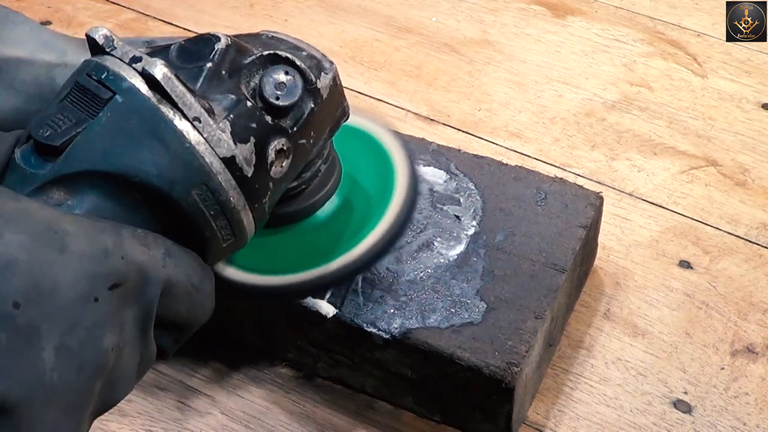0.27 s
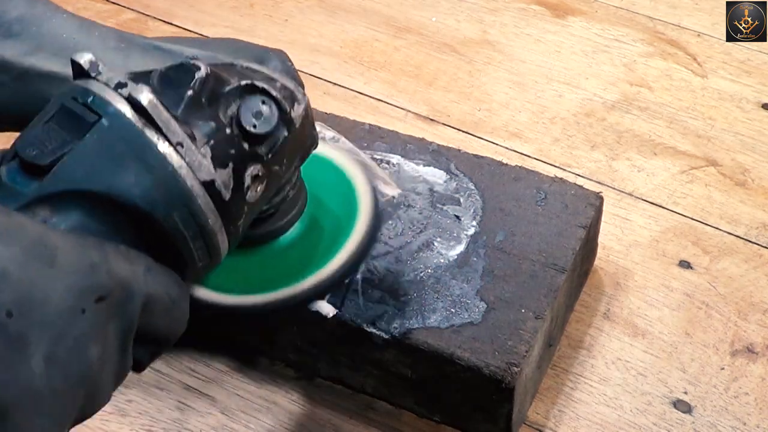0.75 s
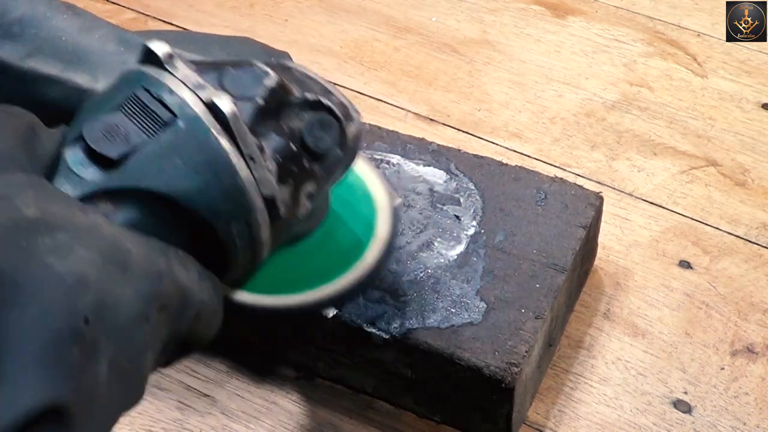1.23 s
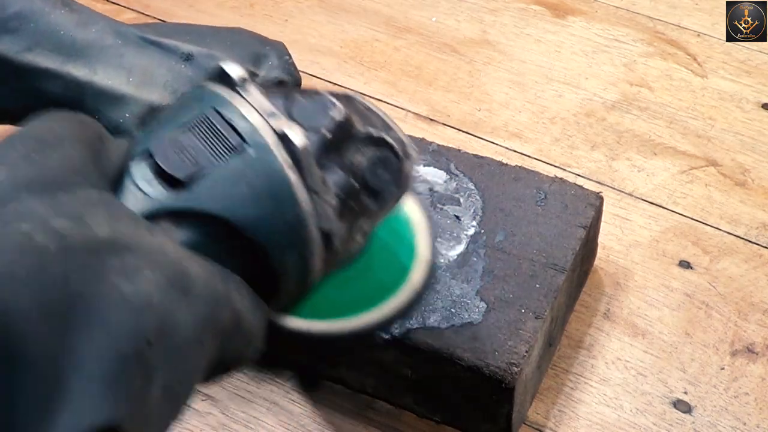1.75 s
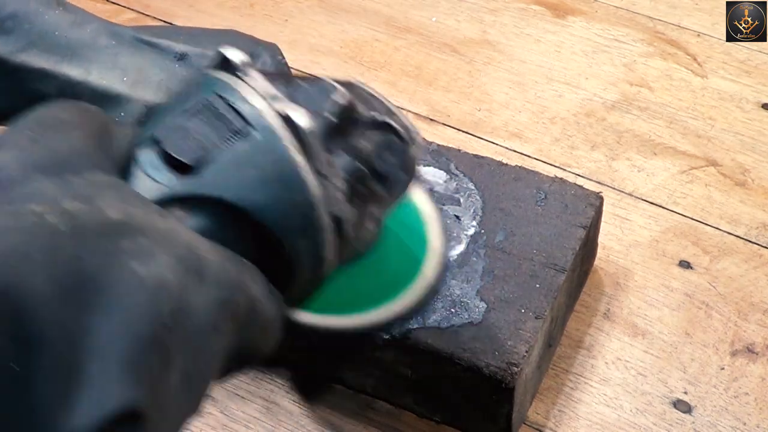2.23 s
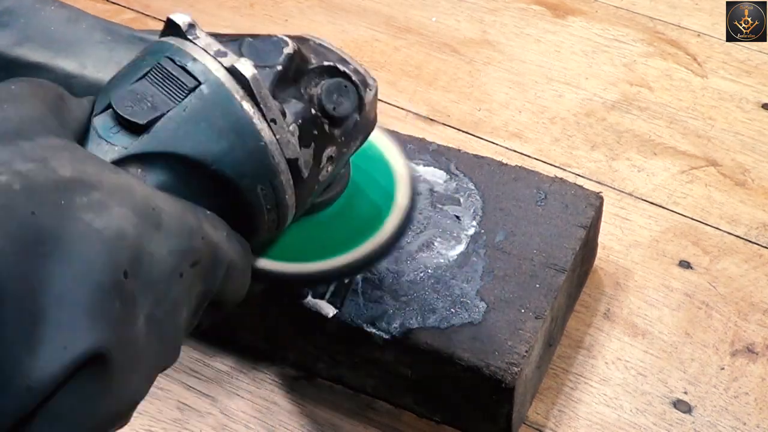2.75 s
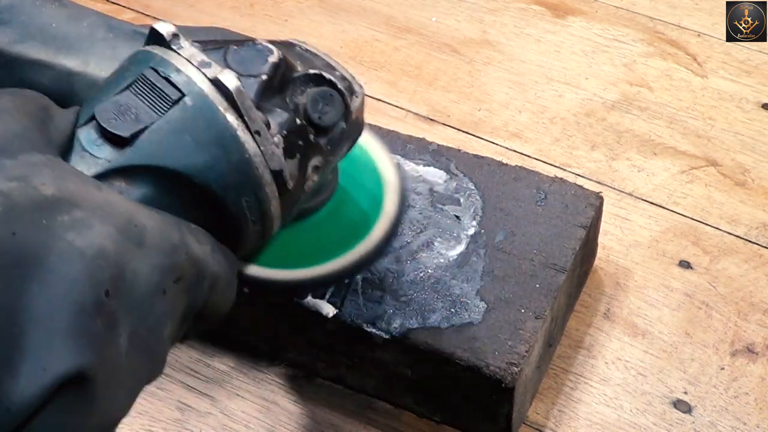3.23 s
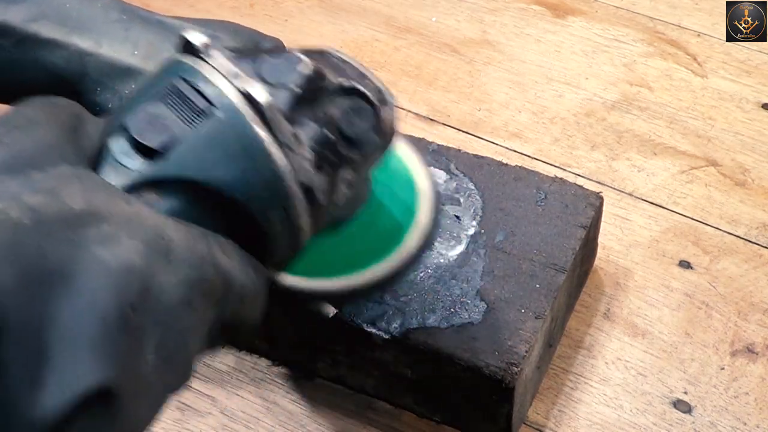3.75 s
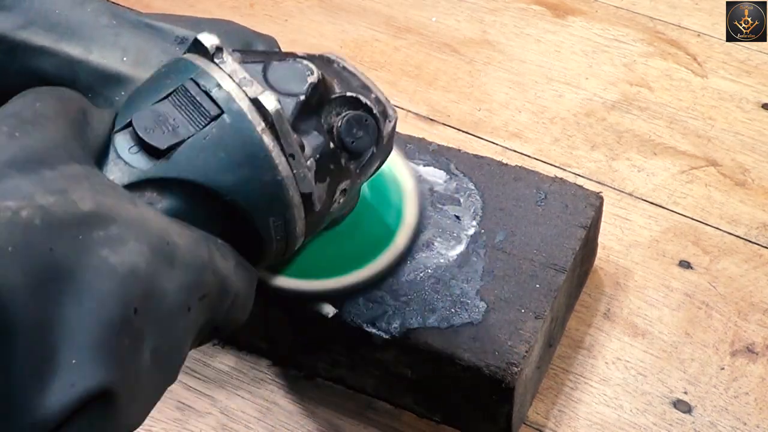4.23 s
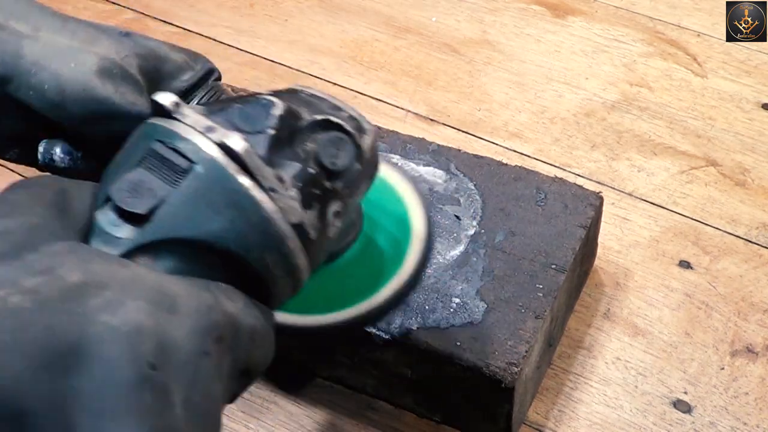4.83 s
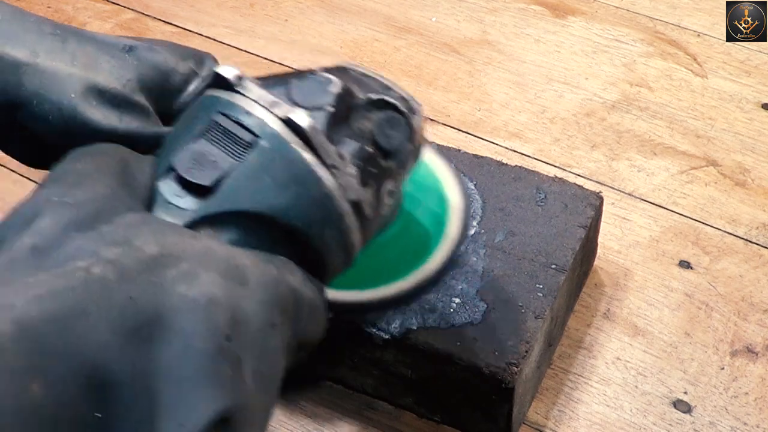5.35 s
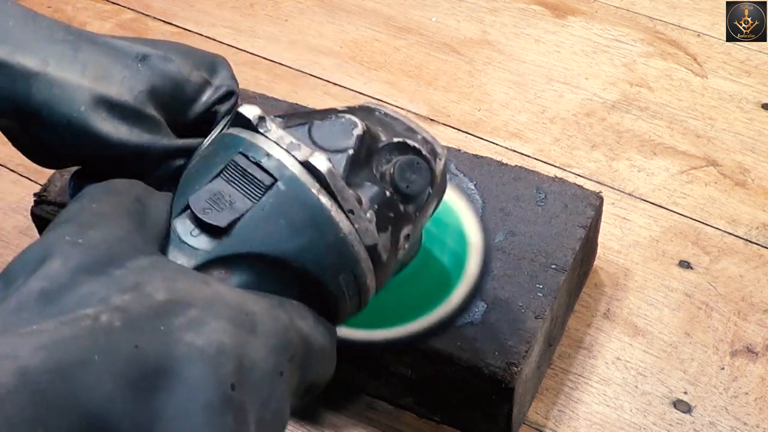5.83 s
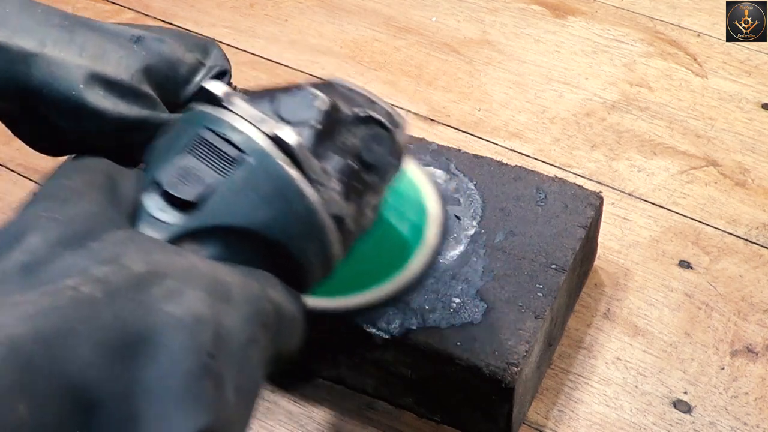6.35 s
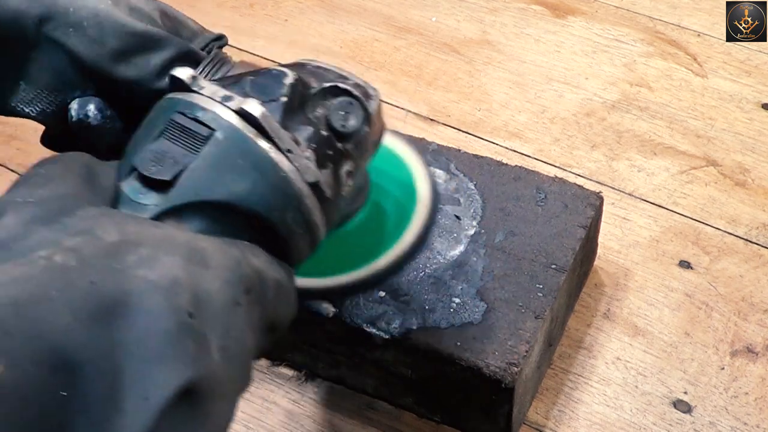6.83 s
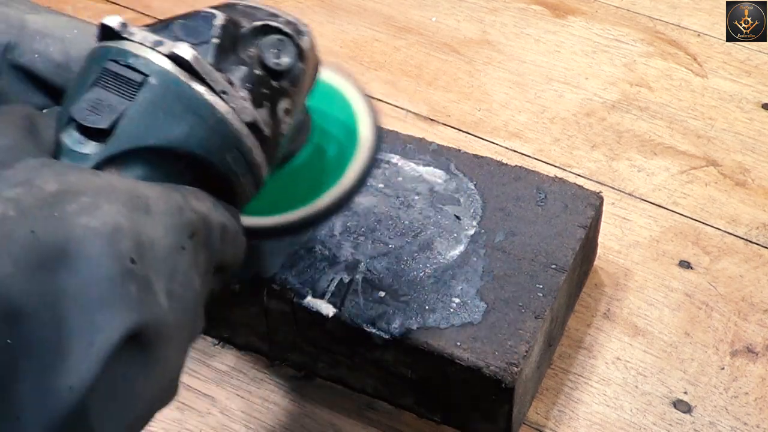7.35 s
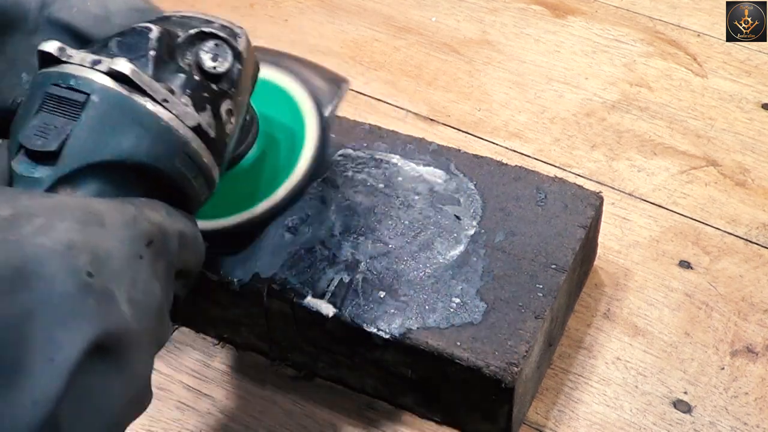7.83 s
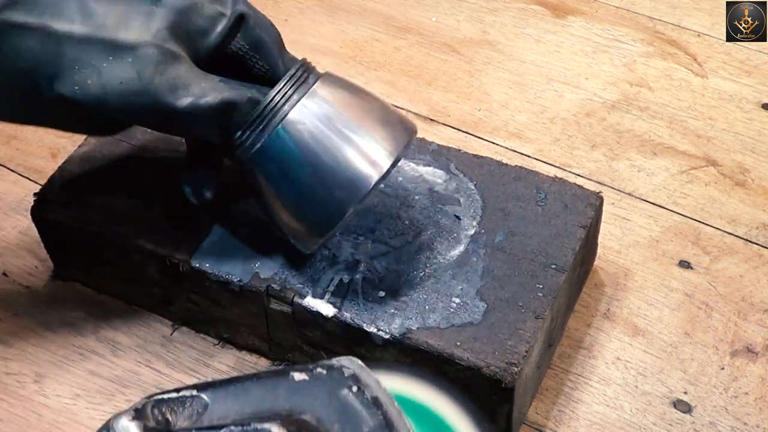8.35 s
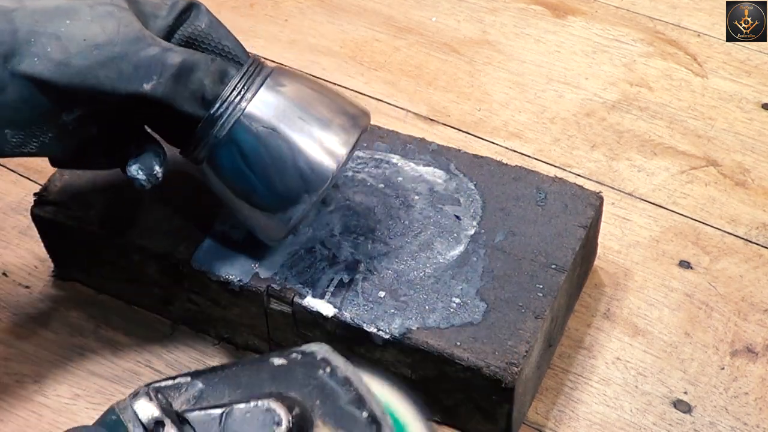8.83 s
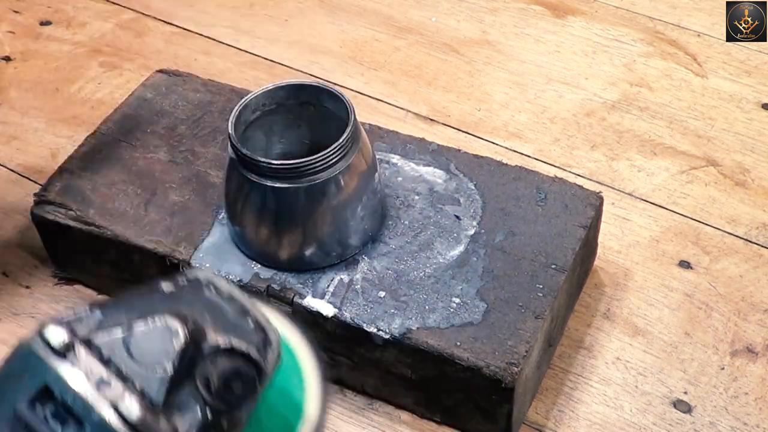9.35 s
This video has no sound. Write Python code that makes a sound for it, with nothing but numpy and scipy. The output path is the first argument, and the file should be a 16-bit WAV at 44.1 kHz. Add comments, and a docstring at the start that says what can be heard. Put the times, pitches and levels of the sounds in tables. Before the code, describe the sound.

A close, dry angle grinder fills the stretch without pause. From 0 s it runs fast and light: a motor hum near 450 Hz, a strong bearing whine near 1.4 kHz, thin higher whistles and broad, bright rasp with airy hiss. Around 0.6-1 s the pad bites on the metal pot and the pitch sags noticeably, turning rougher and fluttery, with small swells and dips. It briefly recovers near 3.2 s, then sags again. At about 4.8 s everything abruptly steps down in pitch, hum near 300 Hz and whine just under 1 kHz. Grinding continues unevenly, easing upward briefly around 7.2 s and sagging by 7.9 s. Lifted at about 8.1 s, it climbs to a smoother, free-running whine with hissier air. Switched off near 8.9 s, it glides down with a slight loose rattle, softening but not stopping by the end, around 9.6 s.

```python
"""The hum and bearing whine of an angle grinder, sagging as its pad presses on a small metal pot; pad rasp and air hiss.
Hum, whine and overtones are sine partials locked to one rotor speed; rasp and air are shaped stereo noise.
Until 4.825 s it runs sped up, with resonances 1.283 times higher; then the pitch steps down.
Near the end the grinder is lifted, turned aside and switched off, and starts to coast down."""
import sys
import numpy as np
from scipy import signal
from scipy.fft import rfft, irfft, next_fast_len
from scipy.io import wavfile
from scipy.ndimage import uniform_filter1d

SR = 44100
rng = np.random.default_rng(int(sys.argv[2]) if len(sys.argv) > 2 else 0)


def dump_mix(stems):
    """Bounce the given channels to the path in sys.argv[1] as a 16-bit WAV at rate SR."""
    frames = np.atleast_2d(stems).T  # one column per channel
    limited = np.clip(frames, -1, 1)  # hard clip at full scale
    pcm = np.round(limited * 32767).astype(np.int16)
    wavfile.write(sys.argv[1], SR, pcm)


N = 422478

FAST_UNTIL_S, SPEEDUP = 4.825, 1.283
OFF_S, COAST_S = 8.92, 0.93  # switch-off; time constant of the run-down
BEARING_ORDER = 19 / 6  # ball passes per rotor turn
SQUEAL_MULTIPLE = 6  # of the ball-pass rate
BAND_LIMIT_HZ = 15870

# rotor speed under drive, sped-up part: t/s, speed/(turns per s)
SPEED_FAST = [(0, 457.0), (0.6, 455.9), (0.96, 391.1), (1.2, 389.6), (1.68, 378.1), (1.91, 387.4),
              (2.02, 383.3), (2.49, 396.2), (2.59, 392.2), (2.9, 405.4), (3.06, 402.6), (3.26, 429.2),
              (3.45, 404.1), (4.1, 388.5), (4.35, 400.6), (4.82, 407.2)]
# rotor speed under drive, after it: t/s, speed/(turns per s)
SPEED_NORMAL = [(4.83, 298.9), (5.05, 301.6), (5.35, 314.9), (5.62, 308.4), (5.98, 308.8), (6.39, 302.6),
                (7.06, 296.5), (7.19, 328.7), (7.3, 330.2), (7.69, 302.9), (7.8, 303.3), (7.93, 288.5),
                (8.09, 327.7), (8.24, 342.7), (8.42, 351.1), (8.92, 353.1)]
# pad on pot: t/s, pressure/0-1
PAD_PRESSURE = [(0, 0.3), (.6, 0.2), (.95, 0.77), (3.1, 0.98), (3.23, 0.44), (3.45, 0.89), (7.9, 1),
                (8.15, 0), (9.58, 0.32)]
# grinder lifted and turned aside: t/s, share/0-1
TURNED_ASIDE = [(0, 0), (7.98, 0.23), (8.16, 1), (9.58, 0.91)]
# swells (+) and dips (-), mostly the pad biting or easing off: centre t/s, length/s, rasp change/dB
PAD_BITES = [(1.067, .08, -0.7), (1.204, 0.3, 0.5), (1.475, .1, -1.8), (1.656, 0.058, 1.5),
             (1.748, .06, -1.6), (1.9, 0.08, 1.2), (2.35, 0.19, 1.1), (2.517, .1, -1.2),
             (3.195, 0.24, -1.5), (3.743, 0.17, -2.1), (4.248, 0.22, 0.4), (4.86, .075, -3),
             (5.235, 0.22, 2), (5.378, 0.16, 2), (6.43, 0.22, -2.5), (6.57, 0.12, -2.5),
             (6.875, 0.054, 1.5), (7.023, 0.23, -3.5), (7.402, 1, 1), (7.83, 0.13, 2.3),
             (7.923, 0.14, -2.5), (8.038, .13, 2.5), (9.21, 0.074, -2.5), (9.284, .08, 2)]
# rotor overtones before resonances and flutter: multiple of rotor rate, level/dB light, pressed, aside
ROTOR_OVERTONES = [(2, -76.5, -76.5, -74), (3, -76, -69, -71), (4, -71, -66, -75), (5, -60, -59, -68),
                   (6, -66, -76, -65), (7, -63, -76, -65.5), (8, -77, -61, -70.5), (9, -52.5, -75, -69),
                   (10, -62, -73, -66), (15, -65.5, -61, -74), (20, -71, -63, -75), (37, -70, -70, -64),
                   (39, -67, -63, -67)]
# bearing overtones, likewise: multiple of ball-pass rate, level/dB light, pressed, aside
BEARING_OVERTONES = [(2, -52, -84, -68), (3, -62, -62, -64), (4, -53, -60.5, -66), (5, -69, -54, -71),
                     (6, -61, -56.5, -62), (7, -56, -69, -69.5), (8, -65, -75, -64.5), (9, -69, -62, -61.5),
                     (10, -73, -64.5, -63), (12, -59, -58, -58.5), (13, -61, -67, -53), (14, -60, -62, -56)]
# base level of the fundamentals, radiated by the housing: speed/(turns per s), hum/dB, whine/dB
HOUSING_RADIATION = [(175.5, -93, -82), (207, -75, -68), (238, -71, -64.5), (260, -73.5, -58),
                     (296, -76.5, -62.5), (296, -73, -54), (312, -72.5, -54.5), (328, -71, -57),
                     (351, -70, -58.3)]
# resonances that swell passing overtones: f/Hz, width/Hz, lift/dB
OVERTONE_RINGS = [(983, 82, 10.5), (4170, 300, 5.5), (6600, 1230, 5.5), (10050, 220, 6.5),
                  (11380, 450, 4.5)]
# squeal, relative: t/s, level/dB
SQUEAL_LEVEL = [(0, -4), (1.1, 5), (1.65, -3), (2.3, 1), (3.4, 1.5), (3.95, -0.5), (4.5, 3), (5.35, -10),
                (6.1, -4), (6.7, 0), (7.3, 0), (7.5, -3), (7.85, 2), (8.25, -7), (8.45, 3), (8.9, 3)]
# rasp base level: light/dB, pressed/dB, aside/dB, coasting change/(dB per halving of speed)
RASP_LEVEL = (-44, -43, -43.5, -2)
# air base level: same columns
AIR_LEVEL = (-47.4, -46.5, -46, -3.5)
# relative rasp spectrum: f/Hz, density/(dB per Hz) sped up, after, aside
RASP_SPECTRUM = [(30, -36, -34, -35), (190, -35.5, -33, -38), (403, -32, -30.5, -31.5),
                 (667, -22, -20, -22), (1134, -10.5, -11, -11.5), (1560, -10, -5, -11),
                 (2490, -8, -7, -5.5), (3280, -5, -1, -4.5), (4560, -1.5, -2.4, 0.5),
                 (5130, -5.5, -0.3, -3), (5900, -3, -1, -4), (8270, -5.5, -1.5, -2.5),
                 (8970, -12, -10.5, -4.5), (11500, -15, -30, -3)]
# relative air spectrum: same columns
AIR_SPECTRUM = [(4000, -69, -70, -68), (9000, -15, -15, -21), (9870, -7, -5.5, -8.5),
                (10800, 0, -2.5, -0.5), (11800, -2.5, -1, -1), (12600, -6, -1.5, -2), (13600, -10, -4.5, 6),
                (14400, -5, -5, 1), (15800, -5, -5.5, -2)]
# housing resonances in the noise: f/Hz, width/Hz, lift/dB
HOUSING_RESONANCES = [(1490, 220, 3.5), (2180, 300, 3), (4350, 1000, 2), (7100, 450, 1.8)]
# slack drive rattling while coasting: f/Hz, width/Hz, lift/dB
RATTLE_RESONANCES = [(2050, 780, 6), (6450, 1200, 3)]
# stereo noise: f/Hz, left-right correlation
STEREO_LIKENESS = [(60, .89), (200, .89), (500, .98), (1500, .75), (3000, .87), (6000, .88), (9000, .85),
                   (14000, .89)]
# stereo noise: f/Hz, left over right/dB
STEREO_LEAN = [(60, 0), (300, 0), (950, 2), (2400, 1.8), (5000, 0.8), (8000, 0.61), (15000, 0)]


def rotor(t, hz, turns, pressure, aside, hum_flutter_db=1.1, flutter_db=2.5, aside_db=-8,
          bite_share=0.72, overtone_share=0.66, low_slow_db=-10, high_slow_db=4,
          radiate_hz=620, rolloff_db=26):
    """Unbalance gives a clean hum; fan and armature add overtones that flutter under load."""
    own_hz = natural(t, hz)
    hum_db = colour(HOUSING_RADIATION, own_hz)[0] + aside_db * aside + bite_share * bite(t)
    hum_db = hum_db + hum_flutter_db * pressure * waver(10)
    out = tone(turns, hz, hum_db, lean_db=.6, lead_s=.00013)
    flutter = flutter_db * (0.22 + pressure) * waver(22) + overtone_share * bite(t)
    slowed = halvings(t)
    for i, (k, db) in enumerate(overtones(ROTOR_OVERTONES, pressure, aside)):
        # small housing: weaker radiation per octave below radiate_hz
        weak_db = rolloff_db * np.maximum(np.log2(radiate_hz / (k * hz)), 0)
        # coasting: low overtones fade, the highest sing out
        slowing_db = slowed * (high_slow_db if k > 20 else low_slow_db)
        # half-second shifts stagger the flutter
        lift_db = resonances(OVERTONE_RINGS, k * own_hz) + slowing_db + np.roll(flutter, i * SR // 2)
        out += tone(k * turns, k * hz, db + lift_db - weak_db, lean_db=2.5, lead_s=.00003)
    return out


def bearing(t, hz, turns, pressure, aside, slip=0.0011, flutter_db=0.58, swell_db=1.95, wander_db=0.6,
            aside_db=-4.0, fast_db=0.8, normal_db=-1.4, free_db=2, bite_share=2.0, whistle_share=0.85,
            coast_db=-5, slow_db=-2.5):
    """Balls roll over one spot of the race; slight slip wobbles the whine and blurs its overtones."""
    # relative speed error
    drift = slip * (.3 + pressure) * waver(70) + .004 * pressure * waver(13)
    passes = BEARING_ORDER * (turns + np.cumsum(hz * drift) / SR)
    pass_hz = BEARING_ORDER * hz
    whine_db = colour(HOUSING_RADIATION, natural(t, hz))[1] + aside_db * aside + bite_share * bite(t)
    whine_db = whine_db + pressure * np.where(t < FAST_UNTIL_S, fast_db, normal_db)
    whine_db = whine_db + free_db * unpowered(t)
    out = tone(passes, pass_hz, whine_db + flutter_db * (0.24 + pressure) * waver(27), lean_db=3.0)
    # without drive the balls strike more softly
    coasting_db = coast_db * unpowered(t) + slow_db * halvings(t)
    # overtones: thin whistles that come and go under load
    swell = (0.24 + pressure) * (swell_db * waver(13) + wander_db * waver(2.6))
    own_hz = natural(t, pass_hz)
    squeal_db = curve(SQUEAL_LEVEL, t)[0]
    bite_db = whistle_share * bite(t)
    for i, (k, db) in enumerate(overtones(BEARING_OVERTONES, pressure, aside)):
        lift_db = resonances(OVERTONE_RINGS, k * own_hz) + np.roll(swell, i * SR // 2)
        lift_db = lift_db + squeal_db * (k == SQUEAL_MULTIPLE)
        out += tone(k * passes, k * pass_hz, db + coasting_db + lift_db + bite_db)
    return out


def rush(t, turns, pressure, aside, chatter_db=0.75, grit_db=0.67, throb=0.11, air_share=0.85,
         normal_db=0.55, off_db=-1.5, rattle_db=0.3):
    """Pad rasp and cooling air follow the bite, chatter as the pad grabs, throb once a turn under load."""
    *rasp_levels, rasp_slow_db = RASP_LEVEL
    *air_levels, air_slow_db = AIR_LEVEL
    rasp_db = by_grip(*rasp_levels, pressure, aside) + rasp_slow_db * halvings(t)
    rasp_db = rasp_db + normal_db * pressure * (t > FAST_UNTIL_S) + off_db * unpowered(t)
    air_db = by_grip(*air_levels, pressure, aside) + air_slow_db * halvings(t)
    bite_db = bite(t)
    rasp = amp(rasp_db + bite_db) * shaped_noise(RASP_SPECTRUM, (2100, 8000), patchy_db=1.5)
    air = amp(air_db + air_share * bite_db) * shaped_noise(AIR_SPECTRUM, (12000, 15500), patchy_db=1.5)
    # the slack drive rattles while it coasts
    chatter = (chatter_db * (-0.04 + pressure) + rattle_db * unpowered(t)) * waver(32)
    grab = amp(chatter + grit_db * waver(300))
    return (rasp + air) * grab * (1 + throb * pressure * np.cos(2 * np.pi * turns))


def tone(turns, hz, db, lean_db=3.0, lead_s=.00006):
    """One partial, a little louder and earlier on the left; silent above the band limit."""
    side = np.array([[.5], [-.5]])
    lead_turns = lead_s * np.minimum(hz, 1300)
    phase = 2 * np.pi * (turns + rng.random() + side * lead_turns)
    return amp(db + side * lean_db) * (hz < BAND_LIMIT_HZ) * np.sqrt(2) * np.sin(phase)


def shaped_noise(spectrum, band_hz, patchy_db):
    """Stereo noise, rms 1 in band_hz before the lean, coloured by housing and facing of the grinder."""
    frames, hz = N // 256 + 5, np.fft.rfftfreq(1024, 1 / SR)
    t = np.arange(frames) * 256 / SR
    aside = np.clip(curve(TURNED_ASIDE, t)[0], 0, 1)[:, None]
    fast = (t < FAST_UNTIL_S)[:, None]
    own_hz = hz / np.where(fast, SPEEDUP, 1)
    before, after, turned = colour(spectrum, own_hz)
    facing_db = (1 - aside) * np.where(fast, before, after) + aside * turned
    housing_db = resonances(HOUSING_RESONANCES, own_hz)
    housing_db = housing_db + unpowered(t)[:, None] * resonances(RATTLE_RESONANCES, own_hz)
    a, b, c, d, patches = rng.standard_normal((5, frames, len(hz)))
    # patches of colour drift as the tool moves
    patches = uniform_filter1d(patches, size=14, axis=0)
    patches = evened(uniform_filter1d(patches, size=5, axis=1))
    gain = amp(facing_db + housing_db + patchy_db * patches)
    in_band = (hz > band_hz[0]) & (hz < band_hz[1])
    power = (gain ** 2 * in_band).mean(1, keepdims=True)
    same = np.clip(colour(STEREO_LIKENESS, hz)[0], -1, 1)
    left = a + 1j * b
    right = same * left + np.sqrt(1 - same ** 2) * (c + 1j * d)
    half_lean_db = colour(STEREO_LEAN, hz)[0] / 2
    z = np.array([left, right]) * gain / np.sqrt(power) * amp([half_lean_db, -half_lean_db])[:, None]
    unit = signal.istft(left.T, nperseg=1024, noverlap=768)[1].std()
    return signal.istft(z.swapaxes(1, 2), nperseg=1024, noverlap=768)[1][:, :N] / unit


def speed(t):
    """Rotor turns per second under load; after switch-off an exponential decay."""
    driven = np.where(t < FAST_UNTIL_S, curve(SPEED_FAST, t)[0], curve(SPEED_NORMAL, t)[0])
    return driven * np.exp(-np.maximum(t - OFF_S, 0) / COAST_S)


def halvings(t):
    """Halvings of the speed since switch-off."""
    return np.maximum(t - OFF_S, 0) / COAST_S / np.log(2)


def unpowered(t, fade_s=0.22):
    """0 to 1 as the drive dies away."""
    return np.clip((t - OFF_S) / fade_s, 0, 1)


def natural(t, hz):
    """Frequency with the speed-up taken out."""
    return hz / np.where(t < FAST_UNTIL_S, SPEEDUP, 1)


def bite(t):
    """Pad bites in dB: each swell or dip is one raised-cosine bump."""
    out = 0
    for s, length, db in PAD_BITES:
        out = out + db * np.cos(np.pi * np.clip((t - s) / length, -.5, .5)) ** 2
    return out


def resonances(rows, hz):
    """Summed resonance lift in dB at hz."""
    return sum(db / (1 + (2 * (hz - f) / width) ** 2) for f, width, db in rows)


def overtones(rows, pressure, aside):
    """Each multiple with its level for the present grip."""
    return [(round(k), by_grip(*levels, pressure, aside)) for k, *levels in rows]


def by_grip(light, pressed, turned, pressure, aside):
    """Blends light-touch, pressed and turned-aside levels."""
    return (1 - aside) * (light + (pressed - light) * pressure) + aside * turned


def waver(rate_hz):
    """Random fluctuation of rms 1, weakened below 3 Hz and above rate_hz."""
    size = next_fast_len(N)
    hz = np.fft.rfftfreq(size, 1 / SR)
    shape = hz / (hz + 3) / (1 + (hz / rate_hz) ** 2)
    return evened(irfft(rfft(rng.standard_normal(size)) * shape, size)[:N])


def amp(db):
    """Decibels to gain."""
    return 10 ** (np.asarray(db) / 20)


def evened(x):
    """Scales to rms 1."""
    return x / np.sqrt(np.mean(x ** 2) + 1e-20)


def curve(rows, t):
    """Columns of a time table at t."""
    s, *columns = np.transpose(rows)
    return [np.interp(t, s, c) for c in columns]


def colour(rows, hz):
    """Columns of a frequency table at hz, interpolated over log frequency."""
    f, *columns = np.transpose(rows)
    return [np.interp(np.log(hz + 1), np.log(f + 1), c) for c in columns]


def scene(wobble=0.00308):
    """One rotor speed drives all partials and the throb; it sags and wobbles as the pad drags."""
    t = np.arange(N) / SR
    pressure = np.clip(curve(PAD_PRESSURE, t)[0], 0, 1)
    aside = np.clip(curve(TURNED_ASIDE, t)[0], 0, 1)
    hz = speed(t) * (1 + wobble * pressure * waver(10.2))
    turns = np.cumsum(hz) / SR
    tones = rotor(t, hz, turns, pressure, aside) + bearing(t, hz, turns, pressure, aside)
    return tones + rush(t, turns, pressure, aside)


def record(dry):
    """Steep low-pass at the band limit."""
    lowpass = signal.firwin(611, BAND_LIMIT_HZ, window=("kaiser", 8), fs=SR)
    return signal.oaconvolve(dry, lowpass[None], "same")


dry = scene()
out = record(dry)
dump_mix(out)
```